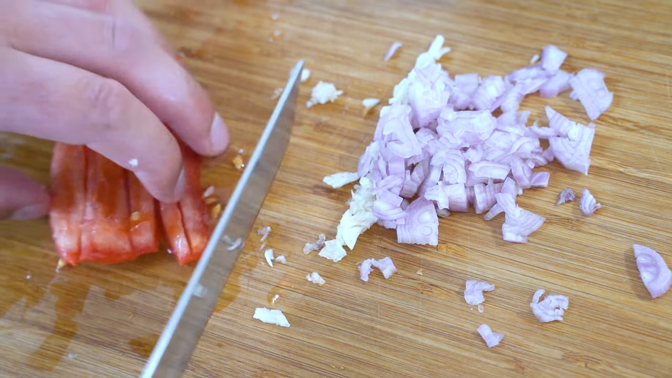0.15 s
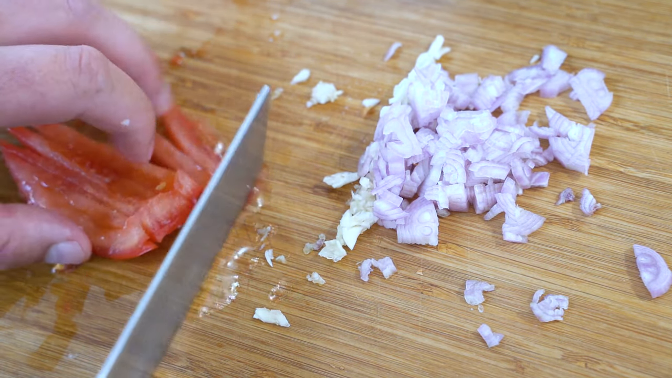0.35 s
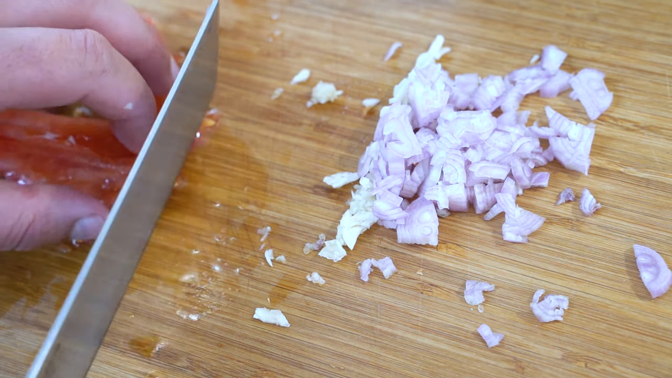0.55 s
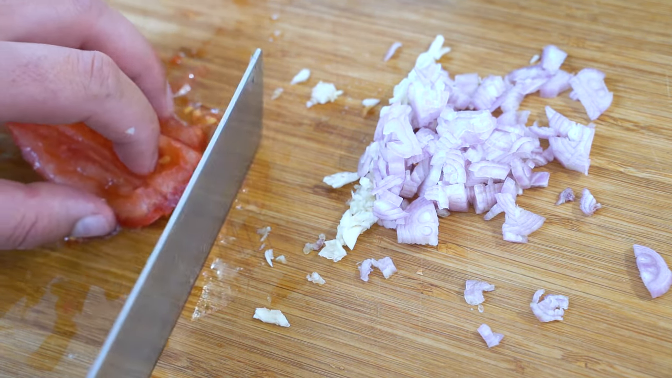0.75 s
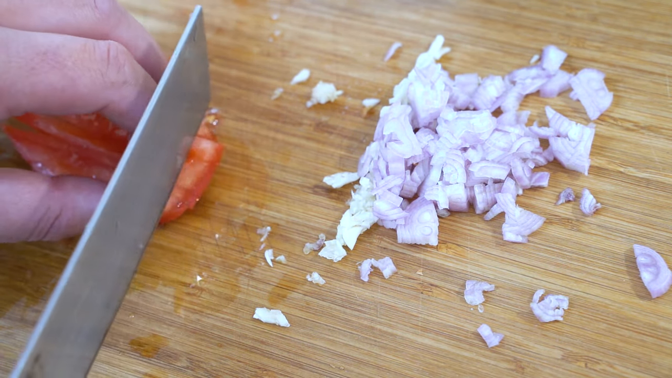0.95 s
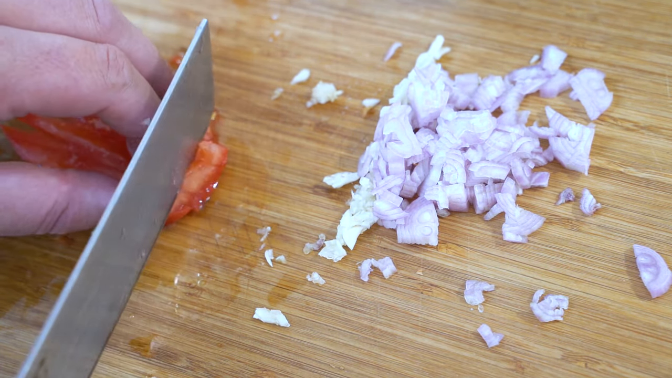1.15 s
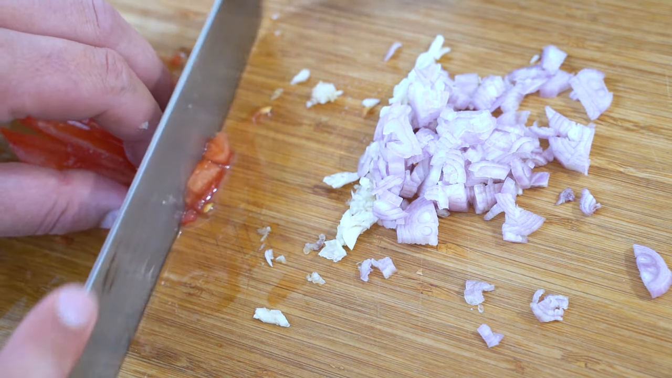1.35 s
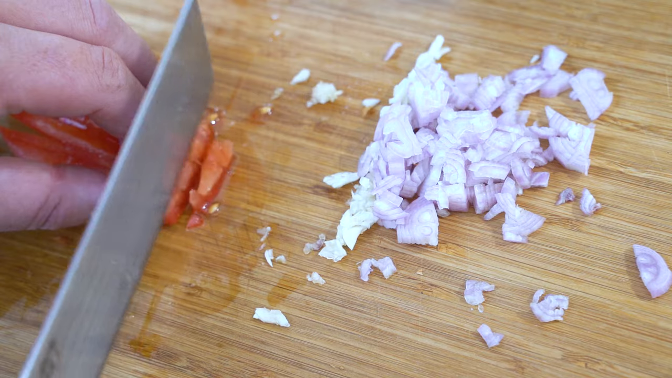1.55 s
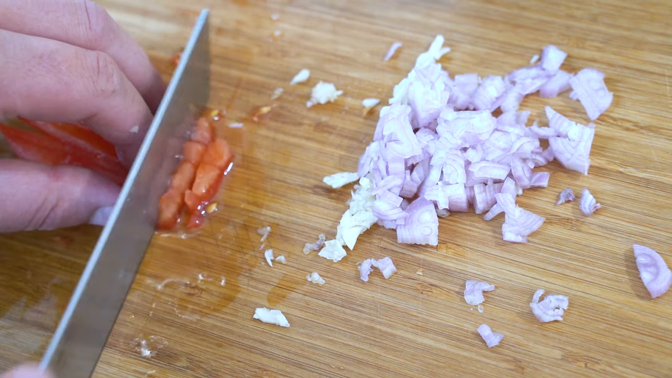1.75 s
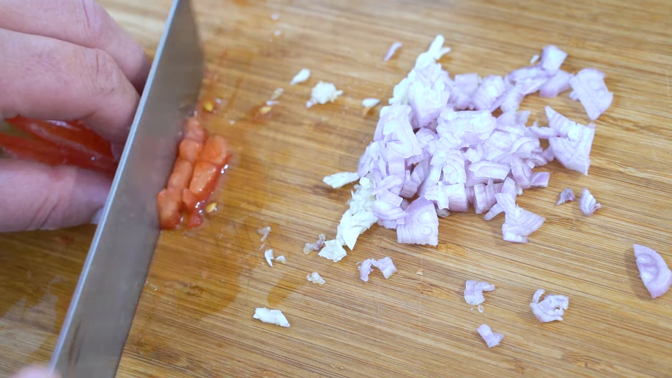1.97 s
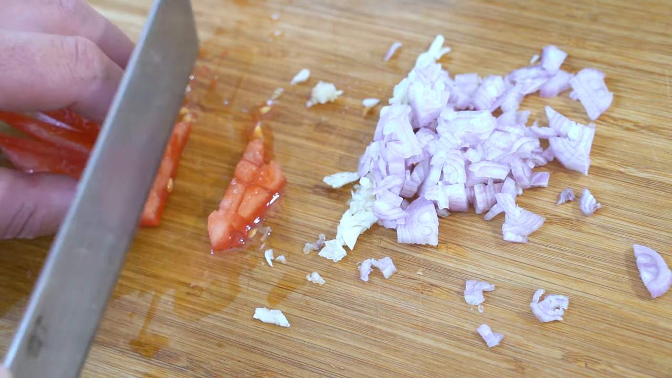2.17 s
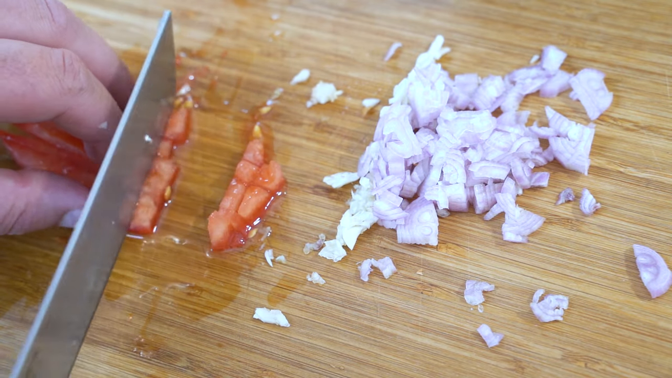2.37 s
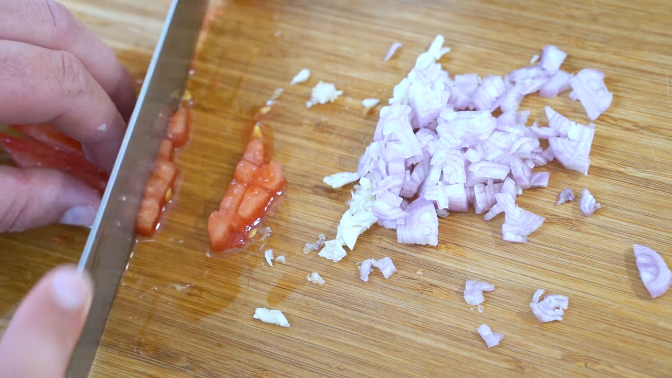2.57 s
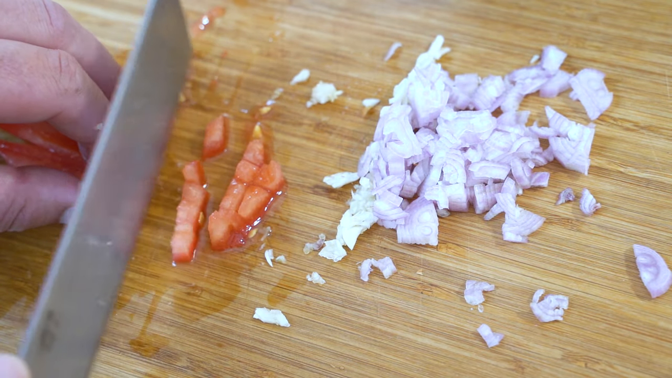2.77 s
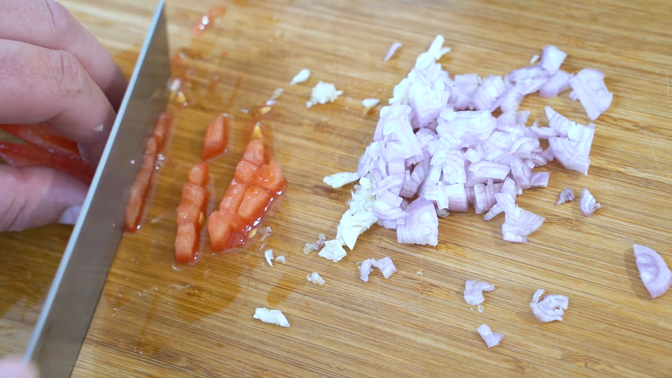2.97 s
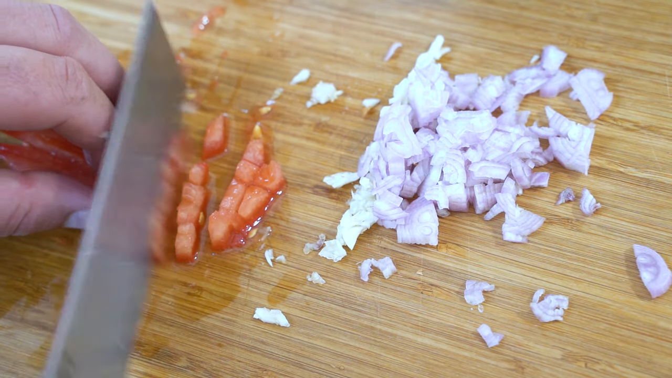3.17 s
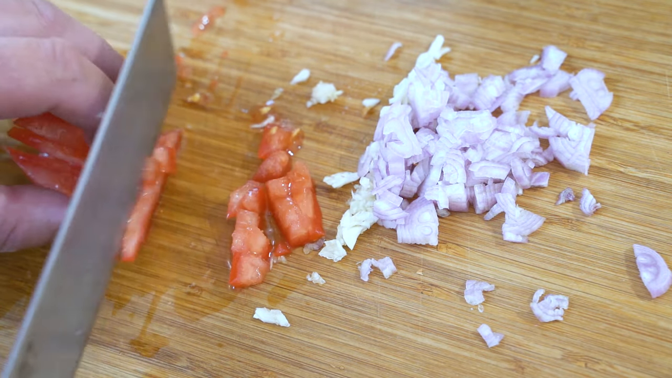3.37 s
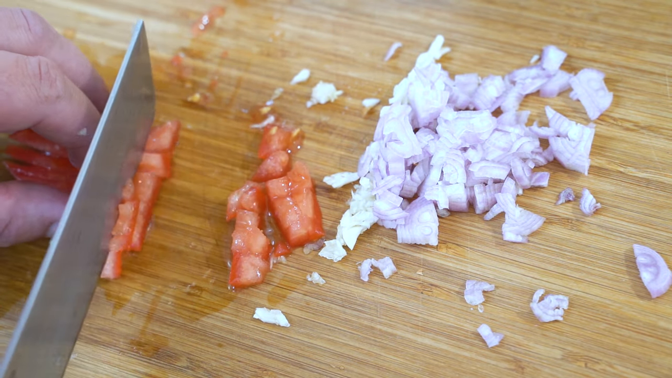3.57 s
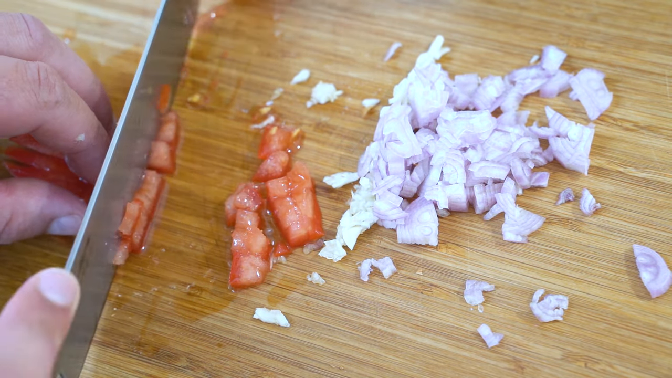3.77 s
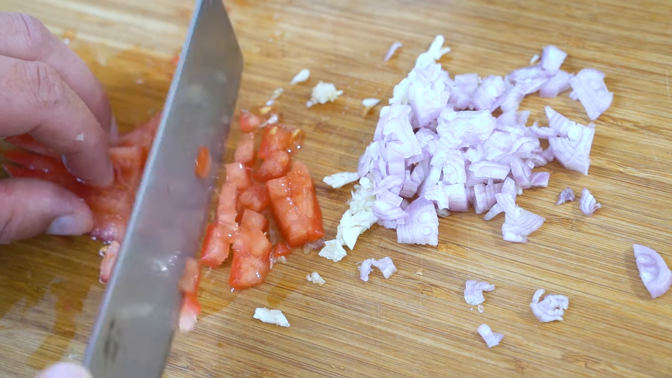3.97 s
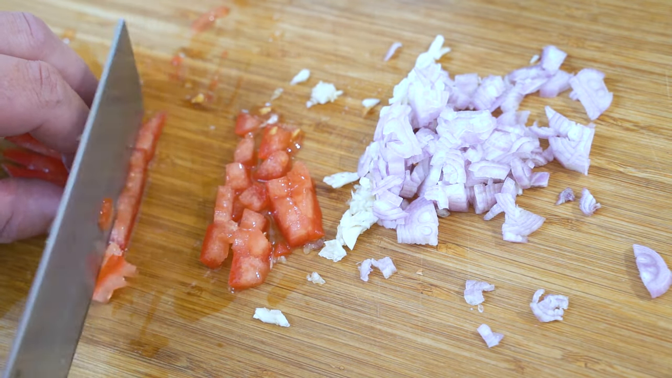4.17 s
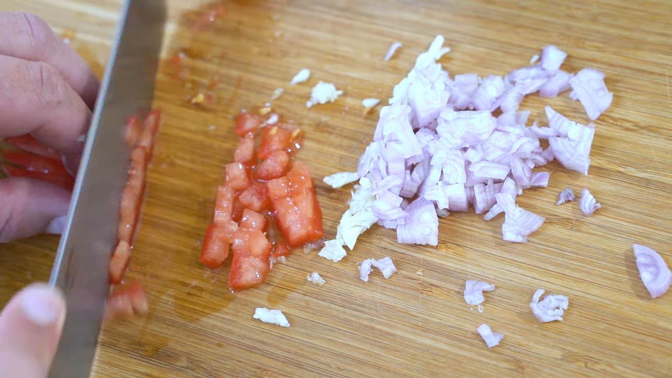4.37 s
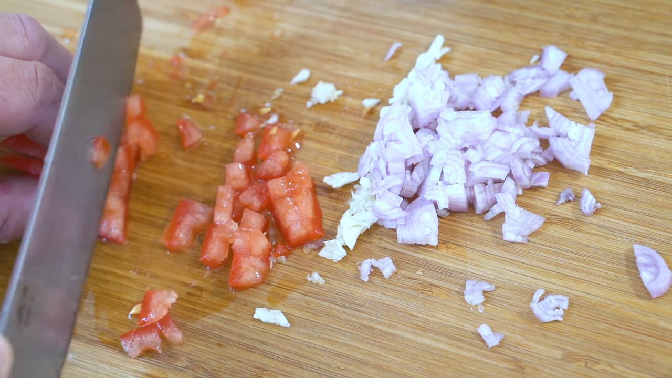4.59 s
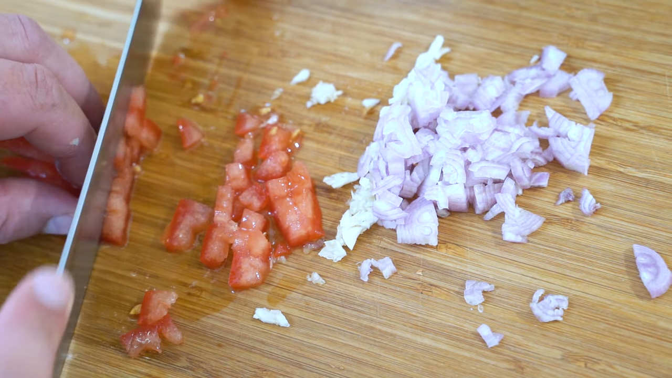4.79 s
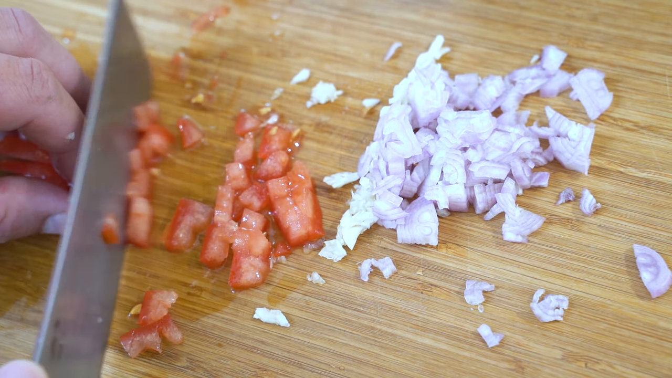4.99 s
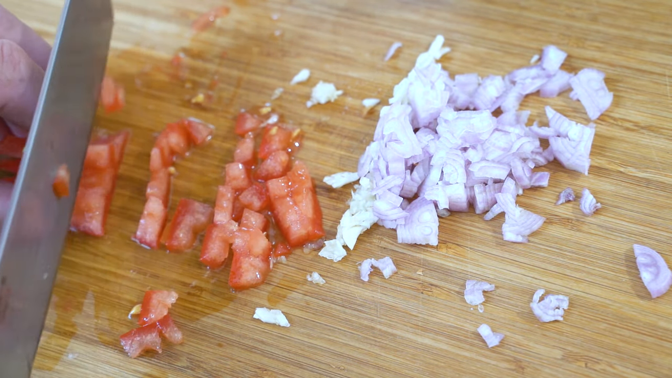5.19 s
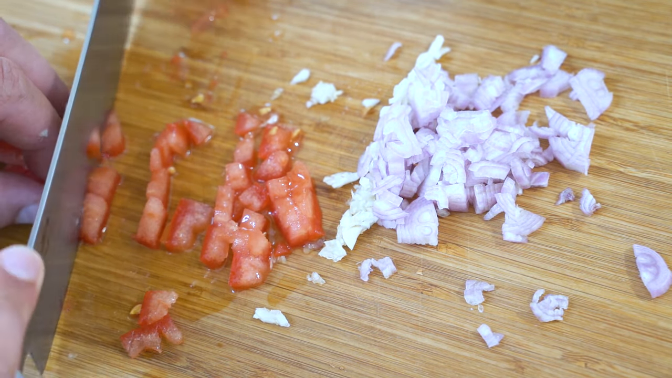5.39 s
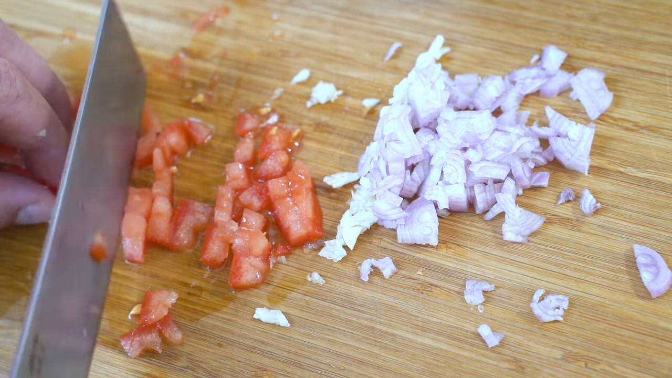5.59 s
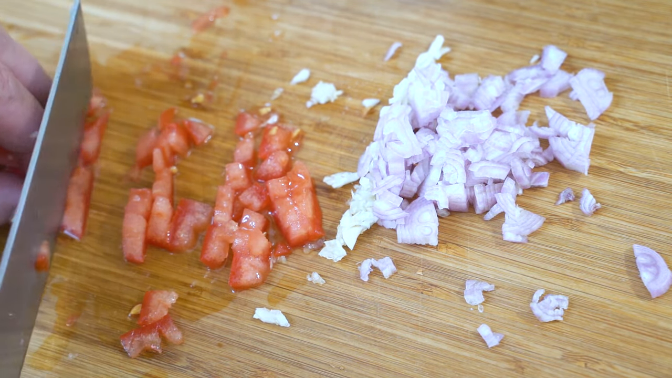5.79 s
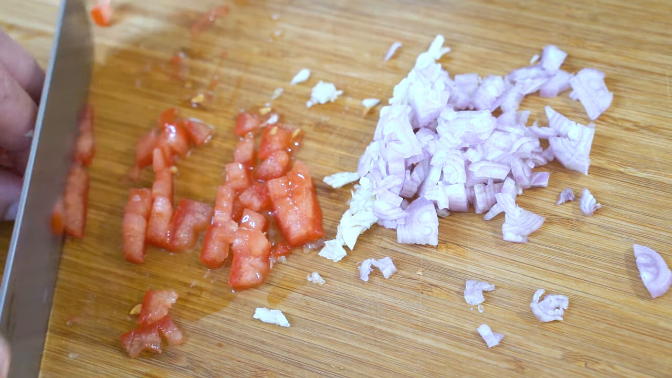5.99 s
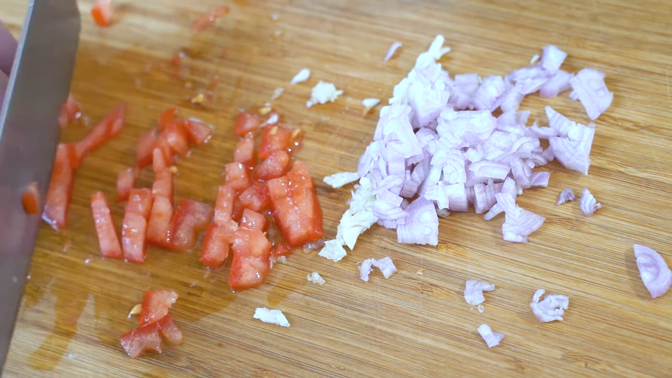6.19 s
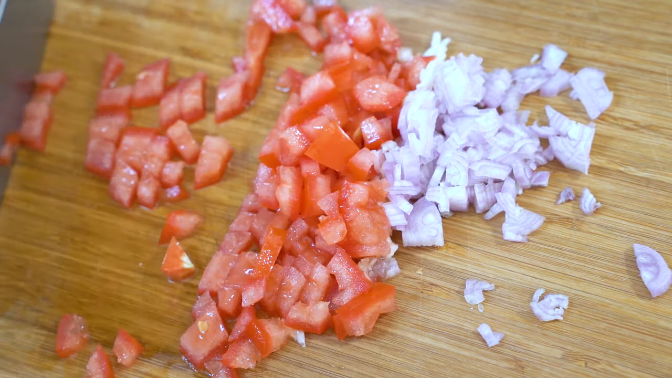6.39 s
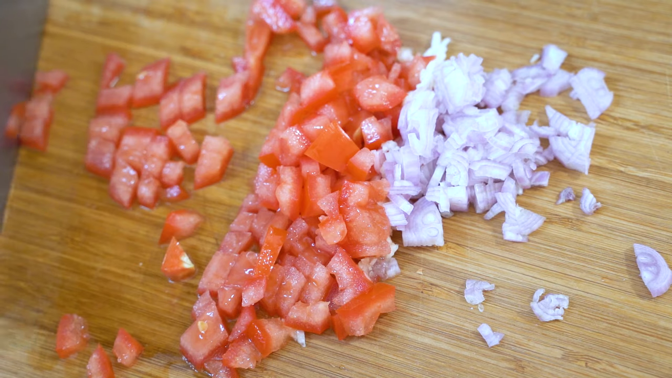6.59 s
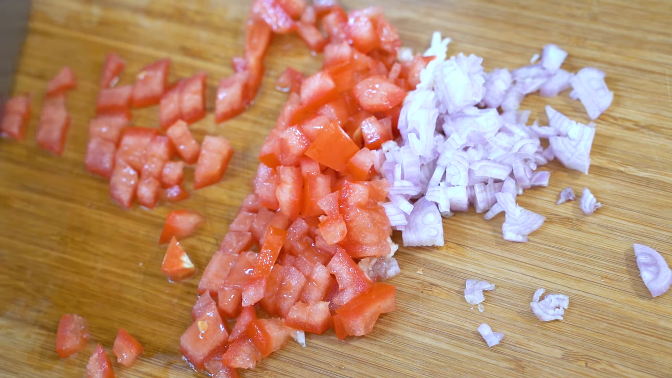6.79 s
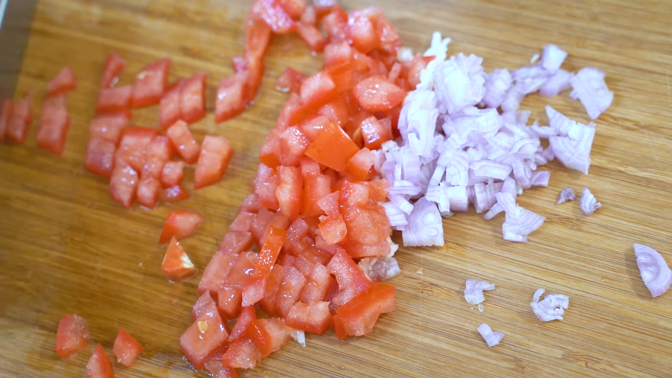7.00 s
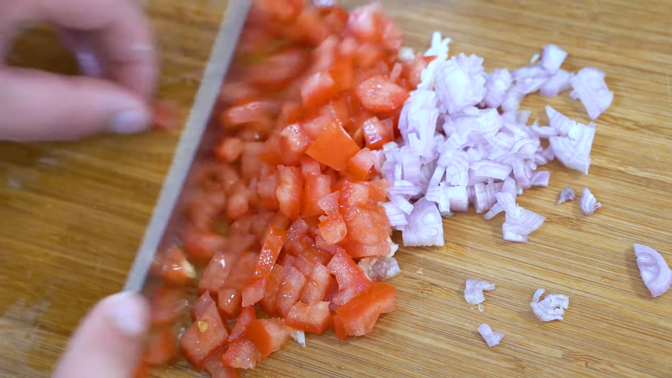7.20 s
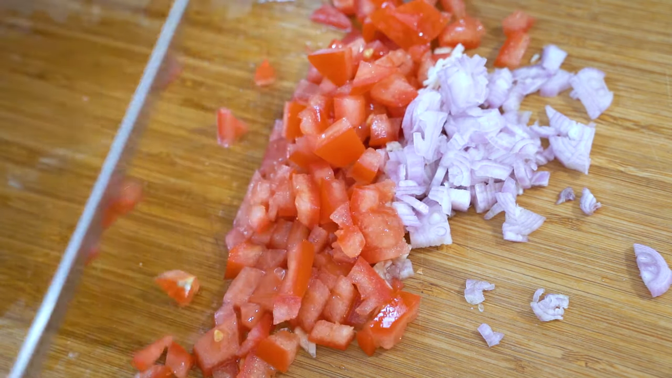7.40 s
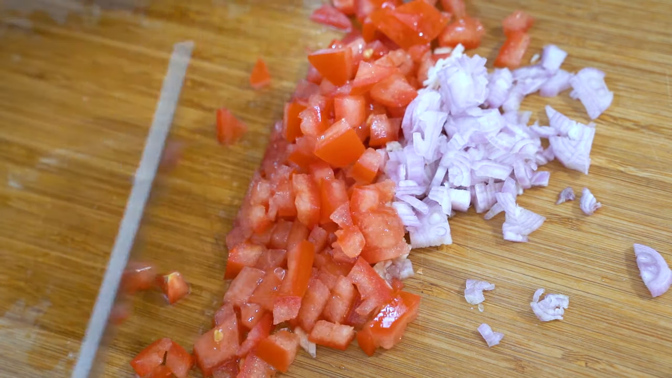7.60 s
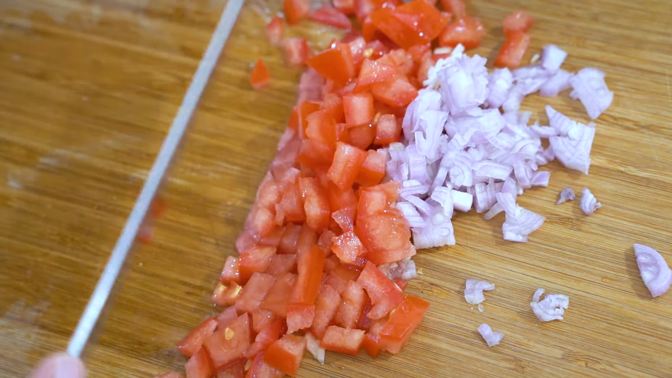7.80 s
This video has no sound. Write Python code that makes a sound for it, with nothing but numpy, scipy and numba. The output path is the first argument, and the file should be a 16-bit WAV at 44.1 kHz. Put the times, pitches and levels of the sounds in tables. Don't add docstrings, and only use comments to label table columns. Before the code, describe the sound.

Close to the microphone in a small hard kitchen, a knife dices tomato. After a quiet start, each stroke crunches wet flesh, knocks the wooden board, slides with a small squeak and pushes pieces aside with a squishy swish and faint blade ring. Two louder chops follow, then two long scraping sweeps with the thin blade singing. Low table rumble and soft room hum lie underneath.

```python
import sys
import numpy as np
from scipy import signal
from scipy.fft import rfft, irfft, next_fast_len
from scipy.io import wavfile
from scipy.ndimage import map_coordinates
from numba import njit

SR = 44100
rng = np.random.default_rng(int(sys.argv[2]) if len(sys.argv) > 2 else 0)


def waveform_to_disk(signal):
    frames = np.transpose(np.atleast_2d(signal))
    scaled = np.clip(frames, -1, 1) * 32767
    samples = np.round(scaled).astype(np.int16)
    wavfile.write(sys.argv[1], SR, samples)


def rack_gain(trim_db):
    fader = np.asarray(trim_db, float)
    return 10 ** (fader / 20)


N = 346185

# (frequency [Hz], level [dB], time to fall 60 dB [s])
BOARD_MODES = [(131.7, -16.5, 0.26), (190, -28, 0.023), (276, -7, 0.12), (411, -8, 0.072),
               (477, -1.5, 0.097), (564, -2, 0.048), (708, -2, 0.055), (795, 3, 0.066), (861, 7.5, 0.051),
               (980, -1.5, 0.11), (1030, -14, 0.06), (1180, -14.5, 0.12), (1430, -1.5, 0.0096),
               (1560, -1.5, 0.036)]
# (time [s], time to full press [s], slide level [dB], rub level [dB])
SLIDES = [(0, 0.0072, -84, -60.5), (.4, 0.0085, -88, -68), (.73, 0.02, -54.5, -58),
          (.8, 0.0049, -72, -45.5), (1.306, 0.0066, -35.5, -55), (1.848, 0.037, -34.5, -39.5),
          (2.482, 0.041, -31.5, -44.5), (3.041, 0.037, -36.5, -49), (3.729, 0.052, -38.5, -54),
          (4.295, 0.047, -39.5, -51), (4.801, 0.052, -38.5, -40), (5.38, 0.041, -39.5, -45.5),
          (5.881, 0.054, -41, -41), (6.483, 0.06, -37, -31.5), (6.911, 0.028, -32, -32.5),
          (7.42, 0.012, -100, -82), (7.657, 0.0046, -39, -36.5)]
# (lift time [s], hiss level [dB], slide level [dB], rub level [dB], top pitch of the wet gap [Hz])
PUSHES = [(.5, -60.5, -76, -68.5, 815), (.92, -85, -85, -67, 920), (1.501, -51, -43, -50.5, 1230),
          (2.059, -49, -45, -55, 1070), (2.739, -43.5, -43.5, -51.5, 1170), (3.255, -42, -55, -51.5, 810),
          (3.988, -45.5, -44, -47.5, 830), (4.515, -50.5, -46, -53.5, 910), (5.04, -50.5, -46, -54.5, 953),
          (5.61, -50, -49, -54.5, 940), (6.098, -49.5, -47.5, -52.5, 760),
          (6.699, -63.5, -44.5, -51.5, 1050), (7.19, -64, -42, -51.5, 980), (7.61, -92, -60, -65, 890),
          (7.8, -86, -82, -64, 906)]
# (time [s], swish level [dB])
TURNS = [(1.41, -49), (1.951, -51), (2.619, -53), (3.155, -68), (3.86, -74), (4.429, -43.5), (4.931, -42),
         (5.5, -44), (6.02, -80), (6.599, -67), (7.02, -45.5)]
SPREAD_DB, DETUNE = 2.5, .006


def unit(x):
    return x / np.sqrt(np.mean(x ** 2))


def colour(x, points):
    hz, db = np.transpose(points)
    size = next_fast_len(len(x), True)
    f = np.maximum(np.fft.rfftfreq(size, 1 / SR), 1)
    gain = rack_gain(np.interp(np.log(f), np.log(hz), db, left=-80))
    return unit(irfft(rfft(x, size) * gain, size)[:len(x)])


def ring(modes, spread_db=0., detune=0., opposed=True):
    hz, db, t60 = np.transpose(modes)[:, :, None]
    chance = rng.standard_normal((2, len(modes), 1))
    t = np.arange(SR // 5) / SR
    sign = (-1.) ** np.arange(len(modes))[:, None] if opposed else -1
    fading = rack_gain(db + spread_db * chance[0] - 60 * t / t60)
    tones = np.sin(2 * np.pi * hz * (1 + detune * chance[1]) * t)
    return np.sum(sign * fading * tones, axis=0)


def through(x, response):
    return signal.fftconvolve(x, response)[:N]


def driven(force, modes):
    response = ring(modes)
    return through(force, response / np.sqrt(np.sum(response ** 2)))


def add(out, s, sound):
    i = int(s * SR)
    out[i:i + len(sound)] += sound[:N - i]


def grit(rate, scatter_db):
    when, size, sign = rng.random(N), rng.exponential(size=N), rng.standard_normal(N)
    largest = 3.5
    return unit((when < rate / SR) * rack_gain(scatter_db * np.minimum(size, largest)) * sign)


def soft_slips(rate, scatter_db):
    return unit(through(grit(rate, scatter_db), np.hanning(int(.0003 * SR) + 3)))


def curve(table, column, outside=-150):
    rows = np.array(table)
    return np.interp(np.arange(N) / SR, rows[:, 0], rows[:, column], left=outside, right=outside)


def swell(s, db, rise, fall, hold_s=0., start_s=0.):
    t = np.arange(N) / SR
    climb_db = rise * np.maximum(s - t, 0)
    fade_db = fall * np.maximum(t - s - hold_s, 0)
    return (t >= start_s) * rack_gain(db - climb_db - fade_db)


def wander(top_hz):
    return colour(rng.standard_normal(N), [(2, 0), (top_hz, 0), (3 * top_hz, -30)])


@njit
def moving_band(x, hz, sharp):
    y, b, l = np.empty(len(x)), 0., 0.
    for i in range(len(x)):
        g = np.tan(np.pi * hz[i] / SR)
        v = (b + g * (x[i] - l)) / (1 + g * (g + 1 / sharp))
        b, l, y[i] = 2 * v - b, l + 2 * g * v, v / sharp
    return y


def knocks():
    # (time [s], peak level [dB], upper board modes [dB], crack level [dB], contact time [ms])
    blows = [(0.779, -27.5, -4.5, -18, 0.34), (1.292, -26, -13, -31, 0.69), (1.834, -20, -10.5, -22, 0.6),
             (2.488, -32.5, -17, -23, 0.75), (3.05, -31.5, -18, -20, 0.82), (3.231, -42.5, -32, -23, 0.62),
             (3.745, -31, -2, -11, 1), (4.314, -42, -6, -10, 0.5), (4.815, -27, -14.5, -14, 0.83),
             (5.396, -34.5, -8, -14, 0.93), (5.906, -30, -7.5, -7, 0.92), (6.441, -11.5, 6.5, -9, 0.12),
             (6.872, -13.5, 8, -8.5, 0.73), (7.633, -23, 5, -4, 0.72)]
    # (frequency [Hz], level [dB], time to fall 60 dB [s])
    top_modes = [(1594, -4.5, 0.011), (1682, 6.5, 0.015), (1730, 7.5, 0.0073), (1883, -13, 0.014),
                 (1950, -6, 0.0068)]
    # (frequency [Hz], level [dB], time to fall 60 dB [s])
    hard_modes = [(2067, -5, 0.01), (2230, -10.5, 0.027), (2482, -14.5, 0.017), (2813, -10.5, 0.011),
                  (2650, -7, 0.0095), (2956, -16.5, 0.0095), (3300, -15.5, 0.015), (3440, -23, 0.013),
                  (3660, -16.5, 0.0067)]
    lag_s, spread_s = .002, .0013
    out, t = np.zeros(N), np.arange(SR // 20) / SR
    for s, db, top_db, crack_db, contact_ms in blows:
        push = np.sin(np.pi * np.clip(t[:200] * 1000 / contact_ms, 0, 1)) ** 2 + 1e-9
        hardness_db = db + 12
        stiff_db = max(.5 * hardness_db, -7)
        modes = [(hz, gain + (hz > 930) * stiff_db, t60) for hz, gain, t60 in BOARD_MODES]
        low = np.convolve(ring(modes, SPREAD_DB, DETUNE, opposed=False), push)
        hard = rack_gain(.45 * hardness_db) * ring(hard_modes, SPREAD_DB, DETUNE)
        top = np.convolve(ring(top_modes, SPREAD_DB, DETUNE) + hard, push[::3])
        low *= np.clip(.3 + np.arange(len(low)) / (spread_s * SR), 0, 1)
        top *= np.clip(.3 + np.arange(len(top)) / (spread_s * SR), 0, 1)
        slap = -np.sin(2 * np.pi * 720 * t) * t / 0.00054 * np.exp(-t / 0.00041)
        slap = signal.sosfilt(signal.butter(2, 300, "high", fs=SR, output="sos"), slap)
        crack = colour(rng.standard_normal(len(t)), [(2500, -27), (5500, 25), (16000, -15)])
        crack *= rack_gain(-60 * t / 0.018)
        add(out, s + lag_s, rack_gain(db + 8.5 - .6 * top_db) * slap)
        add(out, s + lag_s, rack_gain(db - 7.5) * low / push.sum())
        add(out, s + lag_s, rack_gain(db + top_db + 4) * top / np.abs(top).max())
        add(out, s + lag_s, rack_gain(db + crack_db - 7) * crack)
    return out


def landing(lift_s):
    return max(row[0] for row in SLIDES if row[0] < lift_s)


def halt(depth_db):
    t = np.arange(N) / SR
    return rack_gain(depth_db * sum(np.exp(-((t - s) / .028) ** 2) for s, _ in TURNS))


def wet_hiss():
    # (time [s], hiss level [dB], rise [dB/s], hold [s])
    crunches = [(1.272, -48.5, 543, 0.13), (1.825, -46, 450, 0.0046), (2.474, -53, 391, 0.08),
                (3.016, -53.5, 390, .005), (3.737, -48.5, 503, .005), (4.269, -72, 1500, .005),
                (4.815, -63.5, 214, .005), (5.354, -61, 347, .005), (5.89, -66, 520, 0.0057),
                (6.454, -46.5, 2999, 0.16), (6.87, -48.5, 3002, 0.17)]
    # (time [s], length [s], hiss level [dB])
    draws = [
        (1.588, 0.058, -61.5),
        (2.155, 0.037, -63),
        (6.337, .004, -69),
    ]
    release_db_s = 354
    cuts = sum(swell(s, db, rise, 112.5, hold_s) for s, db, rise, hold_s in crunches)
    pushes = sum(swell(s, db, 93.5, release_db_s, 0, landing(s)) for s, db, *_ in PUSHES)
    trails = sum(swell(s, db, release_db_s, release_db_s, length_s) for s, length_s, db in draws)
    return (cuts + pushes) * halt(-16) + trails


def touches():
    # (time [s], peak level [dB], decay [s], board thud [dB])
    skin = [(1.2598, -54, 0.046, -3), (1.275, -35.5, 0.081, -14), (1.8067, -34.5, 0.098, -16),
            (2.369, -53, 0.077, -20), (2.452, -49.5, 0.2, -4), (2.4732, -35, 0.048, -10),
            (2.985, -47, 0.045, -35), (3.0311, -31, 0.12, -14), (3.692, -44, 0.07, -20),
            (3.7238, -32, 0.074, -15.5), (4.2328, -38.5, 0.074, -33), (4.2792, -35, 0.25, -26),
            (4.746, -40, 0.52, -17), (4.792, -34, 0.24, -15), (5.343, -34.5, 0.041, -16),
            (5.3703, -33.5, 0.15, -15), (5.833, -48, 0.051, -21), (5.872, -34.5, 0.35, -19),
            (6.435, -34, 0.063, -32), (6.867, -41.5, .05, -30), (3.95, -39, 0.082, -8),
            (1.4443, -45, .06, -18), (6.441, -30, 0.076, -28), (6.875, -24, 0.043, -25)]
    # (time [s], peak level [dB], blade ring [dB], board thud [dB], lasting ring [Hz])
    aside = [
        (2.0655, -25.5, -20, -21, 2120),
        (2.7323, -30.5, -3.5, -12, 2030),
        (3.2242, -21, -7.5, -17, 2190),
        (3.966, -27.5, -15, -13, 2230),
        (4.49, -47, -0.5, 1, 2610),
        (5.038, -33, -5.5, -14, 2083),
        (5.609, -28.5, -11, -28, 2150),
        (6.09, -41.5, -7, -13, 2380),
        (6.696, -55.5, 9, -16.5, 3140),
        (1.503, -41, -5, -21, 5760),
    ]
    # (frequency [Hz], level [dB], time to fall 60 dB [s])
    side_modes = [(2100, -6, .05), (3150, -5, .03), (5150, -3, .05), (5500, -5, .025), (8500, -4, .015),
                  (11000, -4, .015)]
    puffs, thud, taps = np.zeros(N), np.zeros(N), np.zeros(N)
    t = np.arange(SR // 5) / SR
    bursts = [(s, db, decay_s, -26.5, thud_db, 4760) for s, db, decay_s, thud_db in skin]
    nudges = [(s, db, .055, *rest) for s, db, *rest in aside]
    for table, rise_s in ((bursts, .0035), (nudges, .013)):
        for s, db, decay_s, ring_db, thud_db, ring_hz in table:
            fade_db = 60 * np.maximum(t - rise_s, 0) / decay_s
            puff = rack_gain(db - 6.5 - fade_db) * np.minimum(t / rise_s, 1)
            add(puffs, s, puff)
            add(thud, s, puff * rack_gain(thud_db + 9))
            blade = ring(side_modes + [(ring_hz, -8, .08)], SPREAD_DB, DETUNE)
            tap = signal.fftconvolve(puff * rng.standard_normal(len(t)), blade / np.linalg.norm(blade))
            add(taps, s, rack_gain(ring_db) * tap)
    return puffs, thud, taps


def flesh():
    # (frequency [Hz], level [dB])
    wet_colour = [(590, -33), (1000, -11.5), (1770, -5), (2330, -4), (4470, -3.5), (5130, -5.5),
                  (12400, -4.5), (16000, -12)]
    # (frequency [Hz], level [dB], time to fall 60 dB [s])
    rocking_modes = [(264, -4, 0.07), (380, -10, 0.02)]
    puffs, thud, taps = touches()
    pops = grit(9000, scatter_db=1.8)
    wet = colour(pops, wet_colour)
    dull = signal.sosfiltfilt(signal.butter(2, 6000, fs=SR, output="sos"), wet)
    bright = wet - dull
    clumps = rack_gain(1.5 * wander(150))
    ragged = clumps * (dull * rack_gain(3 * wander(40)) + bright * rack_gain(3 * wander(40)))
    return rack_gain(-6.5) * (wet_hiss() + puffs) * ragged + driven(pops * thud, rocking_modes) + taps


def contact():
    rest_hz = 744
    drag_db_s, lift_db_s = 18, 285
    press = sum(swell(s + full_s, db, 140.5, 218, 0, s) for s, full_s, db, _ in SLIDES)
    rub = sum(swell(s, db, 0, 241, 0, s) for s, _, _, db in SLIDES)
    gap = []
    for s, _, slide_db, rub_db, top_hz in PUSHES:
        start = landing(s)
        press = press + swell(s, slide_db, drag_db_s, lift_db_s, 0, start)
        rub = rub + swell(s, rub_db, drag_db_s, lift_db_s, 0, start)
        turn = max([start + .001] + [at for at, _ in TURNS if at < s])
        gap += [(start, rest_hz), (turn + .015, .9 * rest_hz), (min(s, turn + .09), top_hz)]
    gap_hz = curve(gap, 1, outside=rest_hz) * (1 + .05 * wander(11))
    return press, rub * halt(-2.5), np.clip(gap_hz, 300, 3000)


def slide(press, squeak_modes):
    # (frequency [Hz], level [dB])
    juice = [(900, -32.5), (1400, 5), (1900, -2.5), (2500, -6), (3300, -3.5), (4500, -19.5)]
    hard_press = press * np.minimum(press / rack_gain(-36), 1)
    squeak = driven(soft_slips(1500, scatter_db=1) * hard_press, squeak_modes)
    drag = press * colour(grit(2500, scatter_db=1.8), juice)
    return rack_gain(-14.5) * squeak + rack_gain(-15.5) * drag


def catches(squeak_modes):
    # (time [s], peak level [dB])
    jumps = [(1.305, -32), (1.328, -29), (1.88, -46), (1.896, -25.5), (2.493, -35), (2.521, -26.5),
             (3.072, -34), (3.094, -29), (3.768, -29), (3.782, -31), (4.326, -34), (4.347, -35),
             (4.377, -39), (4.824, -29), (4.833, -33), (5.393, -49), (5.901, -41)]
    out = np.zeros(N)
    for s, db in jumps:
        chirp = np.convolve(ring(squeak_modes, SPREAD_DB, 3 * DETUNE), np.hanning(12))
        add(out, s, rack_gain(db - 1) * chirp / np.abs(chirp).max())
    return out


def rubbing(rub_gain, gap_hz):
    grind = soft_slips(1200, scatter_db=5.5)
    rub = grind * rub_gain
    board = driven(rub, np.array(BOARD_MODES) * [1, 1, .45])
    gap = moving_band(moving_band(rub, gap_hz, 4.2), gap_hz, 4.2)
    swish = grind * sum(swell(s + .045, db, 300, 300, hold_s=.035) for s, db in TURNS)
    swish = moving_band(moving_band(swish, gap_hz, 7.), gap_hz, 7.)
    return rack_gain(-10.5) * board + rack_gain(-8.5) * gap + rack_gain(5.5) * swish


def edge():
    # (frequency [Hz], level [dB], time to fall 60 dB [s])
    squeak_modes = [(1540, -5, .01), (1690, -2, .016), (1800, 0, .018), (1920, -2, .012), (2120, -5, .01)]
    press, rub_gain, gap_hz = contact()
    return slide(press, squeak_modes) + catches(squeak_modes) + rubbing(rub_gain, gap_hz)


def sweeps():
    # (time [s], hiss level [dB], blade song against the hiss [dB])
    strokes = [
        [(7.06, -64, -12), (7.132, -52, 7), (7.165, -37, 2), (7.185, -30.5, -1), (7.21, -35.5, 8.5),
         (7.235, -34.5, 1), (7.272, -37, -4.5), (7.374, -72, -3), (7.5, -68, -6)],
        [(7.636, -40.5, -1), (7.66, -30.5, -5), (7.682, -26, 0.5), (7.7, -25.5, 0.5), (7.715, -29, -7),
         (7.735, -42, -11), (7.76, -48, -1), (7.85, -67, 0)],
    ]
    # (frequency [Hz], level [dB], time to fall 60 dB [s])
    blade_modes = [
        [(3080, -2, .012), (3330, -3, .01), (5400, -5, .009), (5950, -5, .008), (6900, -11, .01),
         (8000, -7, .015), (9500, -7, .014), (11000, -7, .01)],
        [(1590, -5, .04), (3140, -3, .035), (4520, -1, .05), (5500, -1, .035), (5900, -9, .04),
         (6930, -1, .045), (8000, -5, .03), (9500, -1, .03), (10650, -1, .04), (11600, -4, .025),
         (12700, -2, .045), (14700, -4, .025)],
    ]
    # (frequency [Hz], level [dB])
    scrape_colour = [(880, -13), (1500, -33), (1670, -16), (2720, -16.5), (3090, -9), (3880, -12),
                     (12100, -6), (16000, -10)]
    scrape_db = [0, -5]
    grain = grit(12000, scatter_db=5.5)
    song, scrape_gain = 0, 0
    for rows, modes, db in zip(strokes, blade_modes, scrape_db):
        song = song + driven(grain * rack_gain(curve(rows, 1) + curve(rows, 2)), modes)
        scrape_gain = scrape_gain + rack_gain(curve(rows, 1) + db)
    flex = through(.003 * wander(15), np.exp(-np.arange(SR // 5) / (.05 * SR)))
    song = map_coordinates(song, [np.arange(N) + flex], order=3)
    return rack_gain(-.5) * scrape_gain * colour(grain, scrape_colour) + rack_gain(-5) * song


def pings():
    # (time [s], level [dB], frequency [Hz], time to fall 60 dB [s])
    lone_rings = [(.781, -46, 3050, .04), (.781, -52, 3550, .025), (.781, -62, 5900, .08),
                  (5.62, -47, 2200, .15), (6.098, -52, 5600, .06), (7.635, -30, 1750, .03),
                  (7.635, -24, 3000, .04), (5.052, -57, 1150, .2), (3.228, -42, 2060, .1),
                  (3.235, -45, 5100, .14), (2.08, -47, 5200, .13), (5.053, -47, 5250, .13),
                  (5.046, -42, 1900, .015), (3.975, -43, 3300, .04), (5.619, -45, 5400, .09),
                  (.51, -70, 3050, .1), (.5, -66, 4400, .04), (.53, -67, 5600, .03), (.575, -62, 3800, .03),
                  (3.555, -66, 4400, .06)]
    out = np.zeros(N)
    for s, db, hz, t60 in lone_rings:
        add(out, s, ring([(hz, db, t60)]))
    return out


def kitchen(x):
    # (frequency [Hz], time to fall 60 dB [s])
    decay = [(150, 0.319), (500, 0.25), (1500, 0.28), (4000, 0.32), (10000, 0.17)]
    # (delay [s], level [dB])
    echoes = [
        (.0017, -4),
        (.0055, -12),
        (.011, -14),
    ]
    t = np.arange(SR) / SR
    hz, t60 = np.transpose(decay)
    tail = 0
    for centre in 60 * 2. ** np.arange(9):
        octave = [(centre / 2, -30), (centre / 2.013, 0), (centre * 1.66, 0), (centre * 2, -30)]
        band = colour(rng.standard_normal(SR), octave)
        tail = tail + band * np.sqrt(centre) * rack_gain(-60 * t / np.interp(np.log(centre), np.log(hz), t60))
    tail = tail * np.minimum(t / .007, 1)
    tail = tail * rack_gain(-3) / np.sqrt(np.sum(tail ** 2))
    for s, db in echoes:
        tail[int(s * SR)] += rack_gain(db)
    return x + through(x, tail)


def table_shake():
    # (time [s], level [dB])
    shakes = [(.26, -63), (.5, -63), (0.831, -66.5), (1.312, -52), (1.86, -53), (2.532, -53), (2.8, -65),
              (3.08, -56.5), (3.28, -62), (3.8, -53.5), (4.3, -59), (4.83, -54.5), (5.05, -58),
              (5.4, -51.5), (5.71, -87), (5.9, -53), (6.45, -59.5), (6.89, -56.5), (7.301, -61), (7.7, -57)]
    # (frequency [Hz], level [dB])
    shake_colour = [(15, 0.5), (35, 2.5), (70, 0), (120, -3.5), (200, -32.5)]
    # (time [s], peak level [dB], length [s])
    bumps = [
        (5.03, -33.5, 0.021),
        (7.515, -47, 0.014),
        (.25, -52.5, 0.012),
    ]
    gain = rack_gain(-74) + sum(swell(s, db, 158.5, 58) for s, db in shakes)
    out = rack_gain(1.5 * wander(4)) * gain * colour(rng.standard_normal(N), shake_colour)
    for s, db, length_s in bumps:
        phase = np.arange(0, 1.5, 1 / (SR * length_s))
        add(out, s, -rack_gain(db) * np.sin(2 * np.pi * phase) * np.sin(np.pi * phase / 1.5))
    return out


def room_hum():
    # (frequency [Hz], level [dB])
    hum_colour = [(59, -42.5), (100, -24), (140, 3), (156, -3.5), (266, -5.5), (295, -14), (381, -3),
                  (621, -10.5), (801, -11.5), (1650, -24), (3700, -26.5), (4380, -27), (5420, -25.5),
                  (14700, -20.5), (16000, -17)]
    # (frequency [Hz], level [dB], change over the whole time [dB])
    motor_tones = [(112.1, -85, 4.5), (267.4, -74.5, -17), (434.5, -76, -12.5)]
    noise = rng.standard_normal(N)
    motor = 0
    for hz, db, change_db in motor_tones:
        motor = motor + rack_gain(db + change_db * np.arange(N) / N) * driven(noise, [(hz, 0, .4)])
    hum = rack_gain(-67) * colour(rng.standard_normal(N), hum_colour)
    return hum + motor * rack_gain(1.5 * wander(3))


def scene():
    knife = knocks() + flesh() + edge() + sweeps() + pings()
    board = signal.sosfilt(signal.butter(2, 95, "high", fs=SR, output="sos"), knife)
    return (rack_gain(-3) * kitchen(board) + table_shake() + room_hum())[None]


def top_cut(x):
    return signal.sosfilt(signal.butter(12, 16500, fs=SR, output="sos"), x)


def record(dry):
    mix = signal.sosfilt(signal.ellip(8, .2, 60, 15900, fs=SR, output="sos"), dry)
    return top_cut(mix)


dry = scene()
out = record(dry)
waveform_to_disk(out)
```